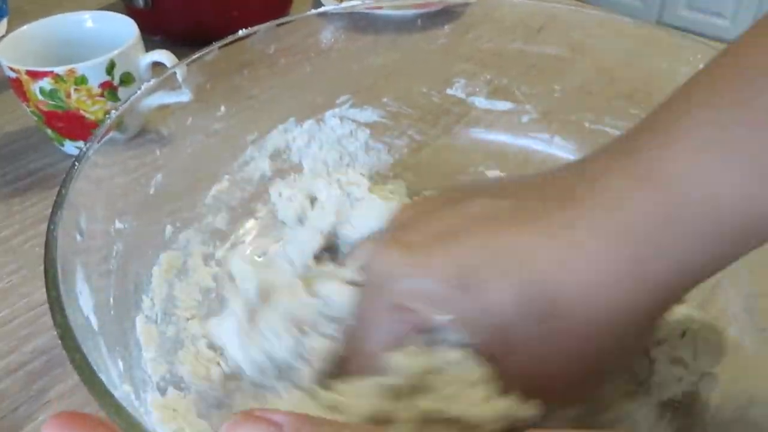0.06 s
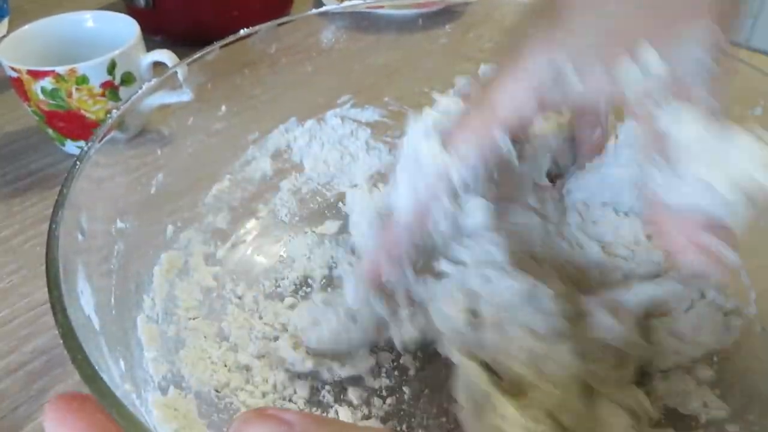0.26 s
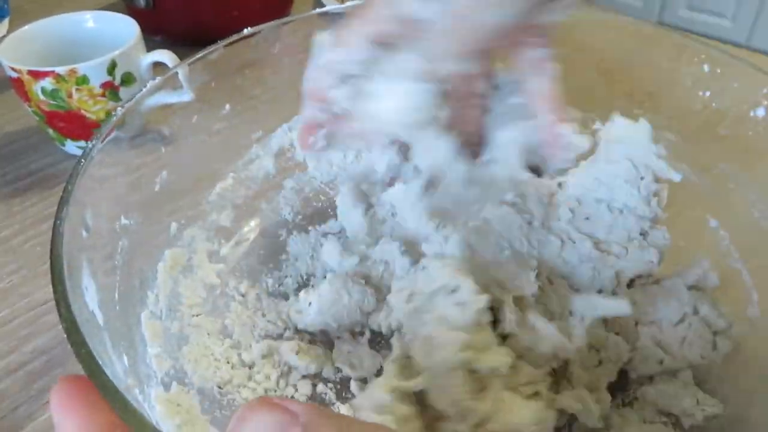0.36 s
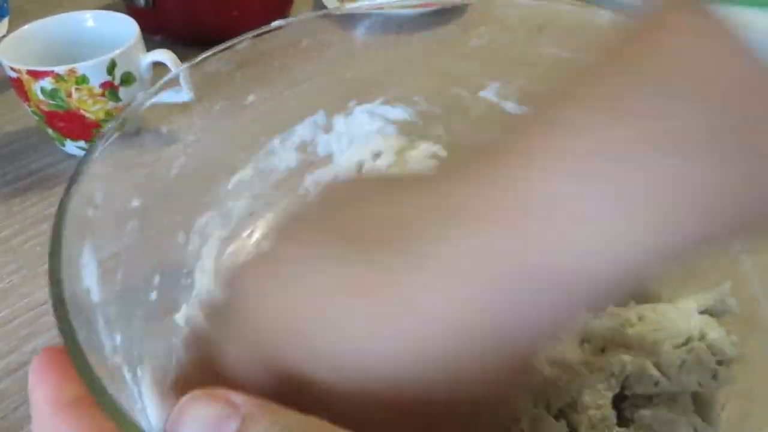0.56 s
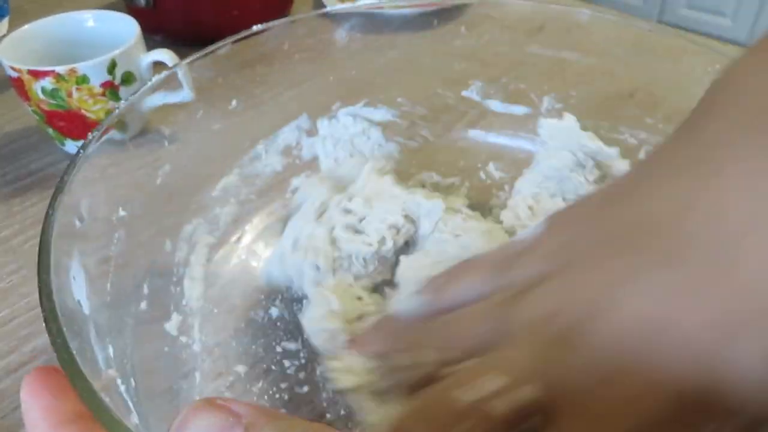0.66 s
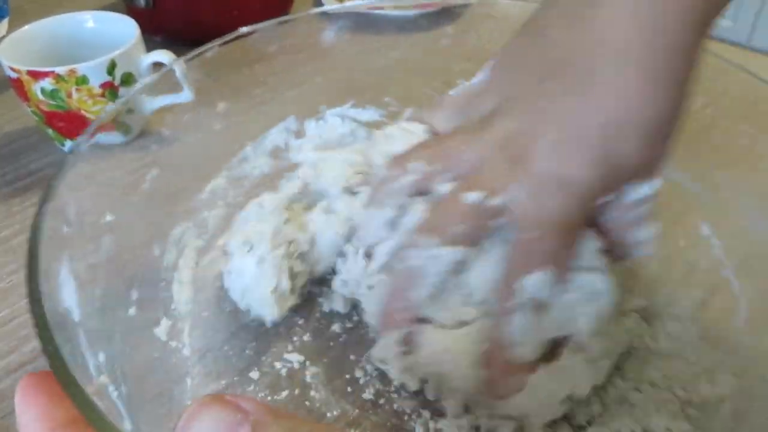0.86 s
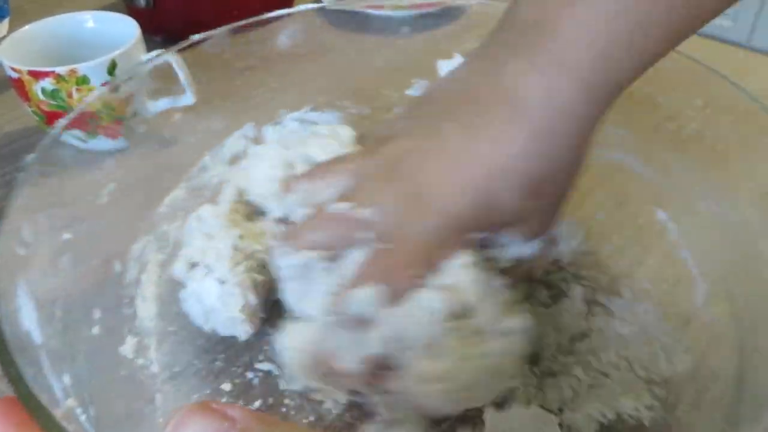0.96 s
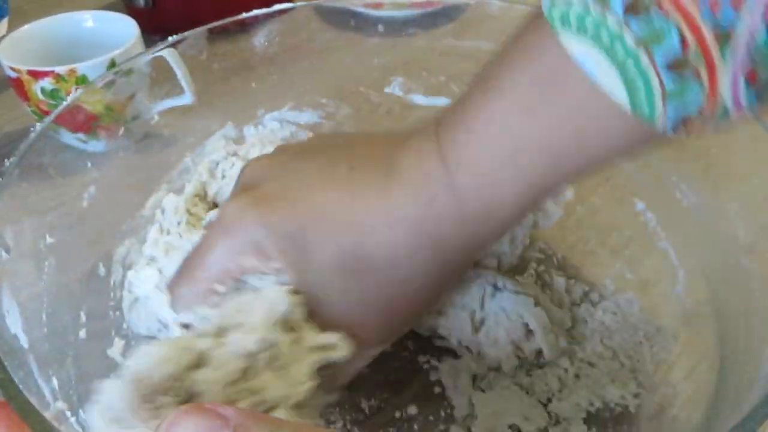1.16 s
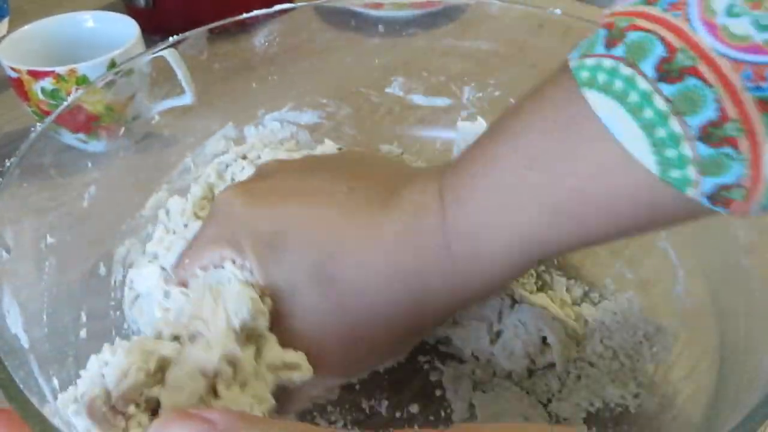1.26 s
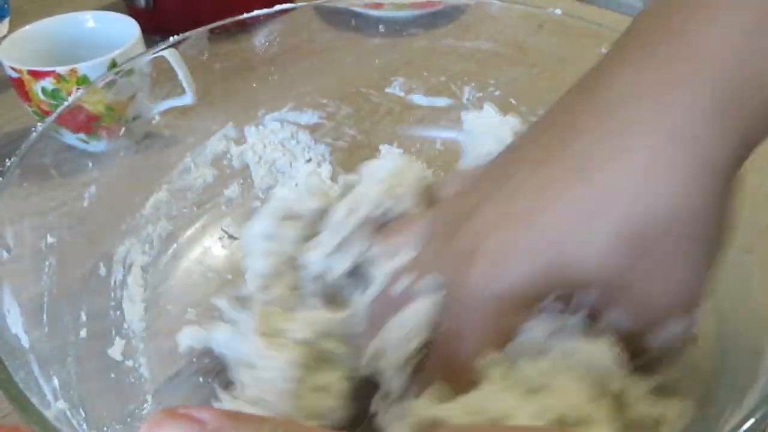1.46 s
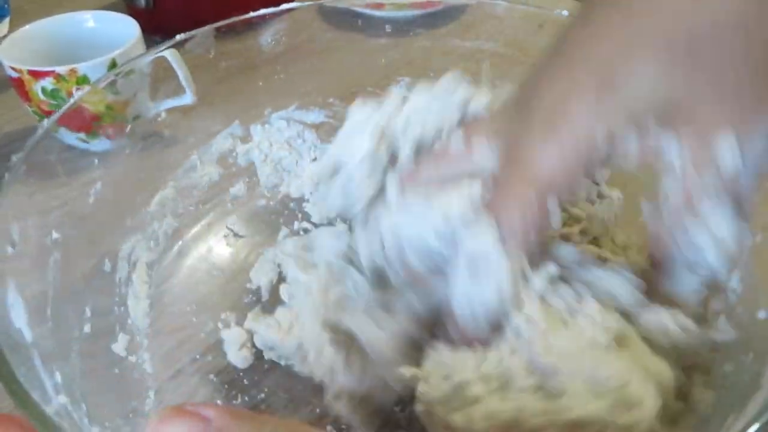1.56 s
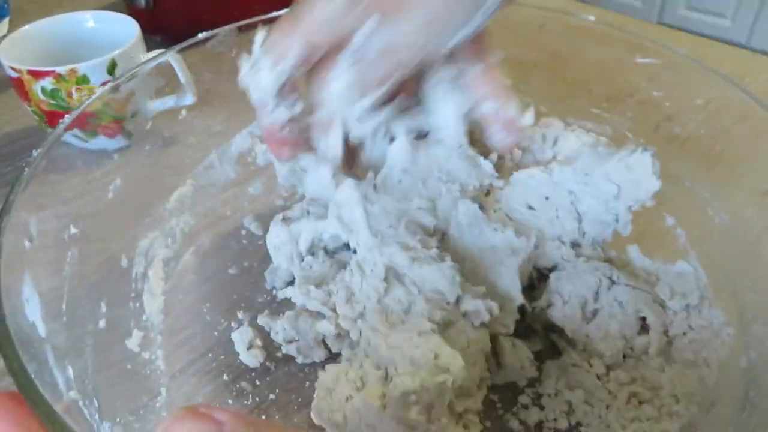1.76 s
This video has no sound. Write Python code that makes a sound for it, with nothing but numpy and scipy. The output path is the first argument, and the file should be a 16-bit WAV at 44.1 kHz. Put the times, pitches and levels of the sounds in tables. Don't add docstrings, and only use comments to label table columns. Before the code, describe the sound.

Dough being kneaded in a glass bowl, heard close through the tabletop in a quiet, faintly humming room: muffled rubbing and crumb hiss, an early woody knock with small bounces, more rocking, and late sharp sticky snaps.

```python
import sys
import numpy as np
from scipy import signal
from scipy.fft import rfft, irfft
from scipy.io import wavfile
from scipy.ndimage import uniform_filter1d

SR = 44100
rng = np.random.default_rng(int(sys.argv[2]) if len(sys.argv) > 2 else 0)


def bounce(signal):
    frames = np.transpose(np.atleast_2d(signal))
    limited = np.clip(frames, -1, 1)
    pcm = np.round(limited * 32767).astype(np.int16)
    wavfile.write(sys.argv[1], SR, pcm)


def invert_db(x):
    u = np.asarray(x, float) / 20
    return 10 ** u


N = 79380

# pitch_hz, level_db (per Hz)
CRUMB_COLOUR = [(470, -8.5), (800, -0.5), (895, 3.5), (1330, -8), (2640, -9), (2870, -9), (7480, -21),
                (15600, -27.5)]


def evened(x):
    return x / np.sqrt(np.mean(x ** 2) + 1e-20)


def colour(x, points, tilt_db=0.):
    hz = np.fft.rfftfreq(len(x), 1 / SR) + 1
    point_hz, point_db = np.transpose(points)
    level_db = np.interp(np.log(hz), np.log(point_hz), point_db)
    level_db = level_db + tilt_db * np.log2(np.clip(hz, 300, SR) / 3000)
    return irfft(rfft(x) * invert_db(level_db), len(x))


def add(mix, start_s, sound):
    part = mix[round(start_s * SR):][:len(sound)]
    part += sound[:len(part)]


def grains(per_s, spread_db):
    draw = rng.random((N, 3))
    happens = draw[:, 0] < per_s / SR
    direction = np.sign(draw[:, 1] - .5)
    return happens * direction * invert_db(-spread_db * np.log(draw[:, 2] + 0.0023))


def body(x, modes):
    hz = np.fft.rfftfreq(len(x), 1 / SR)
    shape = 0
    for k, (mode_hz, width_hz, db) in enumerate(modes):
        loss = 1j * hz * width_hz
        shape = shape + (-1) ** k * invert_db(db) * loss / (mode_hz ** 2 - hz ** 2 + loss)
    return evened(irfft(rfft(x) * shape, len(x)))


def effort(curve, column, flutter_db, smooth_s):
    flutter = evened(uniform_filter1d(rng.standard_normal(N), round(smooth_s * SR)))
    rows = np.transpose(curve)
    level_db = np.interp(np.arange(N) / SR, rows[0], rows[column])
    return invert_db(level_db + flutter_db * flutter)


def room_air():
    # pitch_hz, level_db (per Hz)
    room_points = [(15, -39), (25, -46), (96, 6), (227, 11), (389, 3.5), (445, -14.5), (553, -2.5),
                   (7520, -32), (15600, -70)]
    return invert_db(-36.5) * evened(colour(rng.standard_normal(N), room_points))


def side_air():
    # pitch_hz, level_db (per Hz)
    side_points = [(35, -38), (60, -22), (285, -1.5), (443, -0.5), (870, -8), (1790, -9), (8900, -21),
                   (13200, -22.5), (15600, -21)]
    return invert_db(-51) * evened(colour(rng.standard_normal(N), side_points))


def sway(crest_s, db, sign, hz, swell_s):
    t = np.arange(-.08, .12, 1 / SR)
    shape = np.exp(-(t / np.where(t < 0, swell_s, 1.4 * swell_s)) ** 2)
    return crest_s - .08, sign * invert_db(db) * shape * np.cos(2 * np.pi * hz * t)


def table_sways():
    # crest_s, level_db, direction, pitch_hz, swell_s
    pushes = [(.146, -32, 0.75, 219, 0.011), (.49, -16, 1, 110, 0.0045), (.507, -22, 0.84, 72, 0.009),
              (0.5631, -19.5, -1.1, 240, 0.0033), (0.5744, -26.5, 0.82, 228, 0.013),
              (0.5879, -26, 0.82, 240, 0.013), (0.662, -31.5, 0.9, 171, 0.019), (.77, -29, 0.8, 282, 0.024),
              (.82, -29.5, 0.94, 120, 0.02), (0.9703, -27.5, -1, 102, 0.0081),
              (.976, -25.5, 0.88, 258, 0.018), (1.005, -23, -1.1, 126, 0.006),
              (1.008, -30, 0.95, 282, 0.0074), (1.0216, -24.5, 0.9, 258, 0.0038),
              (1.0218, -17, 0.81, 132, 0.015), (1.044, -26, 1, 238, 0.0075),
              (1.075, -25.5, 0.83, 138, 0.0096), (1.0858, -27, -0.88, 240, 0.007),
              (1.105, -23.5, 0.66, 159, 0.011), (1.131, -36, -0.65, 195, 0.0053),
              (1.354, -28.5, 0.67, 215, .015), (1.446, -26, 0.88, 230.3, 0.027),
              (1.595, -33, 0.66, 228, 0.0054)]
    mix = np.zeros(N)
    for push in pushes:
        add(mix, *sway(*push))
    return mix


def knock(peak_s, db, sign, pitch_share, blow_s, modes):
    damp_s, tail_share = .015, .25
    t = np.arange(-.02, .25, 1 / SR)
    after = np.maximum(t, 0)
    swell = np.exp(-(np.minimum(t, 0) / blow_s) ** 2)
    fade = tail_share + (1 - tail_share) * np.exp(-(after / damp_s) ** 2)
    ring = 0
    for hz, mode_db, t60 in modes:
        ring = ring + invert_db(mode_db - 60 * after / t60) * np.cos(2 * np.pi * hz * pitch_share * t)
    return peak_s - .02, sign * invert_db(db) * swell * fade * ring


def bowl_knocks():
    # pitch_hz, level_db, t60_s (time to fall 60 dB)
    thud_modes = [(70, -3.5, 0.15), (120, 2, 0.36), (238, 1.5, 0.099), (264, -19, 0.27)]
    # peak_s, level_db, direction, pitch_share (times the mode pitch), blow_s
    landings = [
        (0.4407, -19.5, -0.31, 1.7, 0.0018),
        (0.4475, -8.5, 0.79, 1.02, 0.0041),
        (0.4715, -20.5, -0.77, 1.56, 0.0025),
        (0.486, -27.5, -0.97, 0.77, 0.0033),
        (0.5635, -22.5, -0.79, 2.02, 0.0016),
        (0.598, -29, 0.85, 0.635, 0.02),
        (1.0553, -28, -0.44, 1.9, 0.0023),
    ]
    mix = np.zeros(N)
    for landing in landings:
        add(mix, *knock(*landing, thud_modes))
    return mix


def tap(start_s, db, hz, spread, contact_s, modes):
    t = np.arange(0, .1, 1 / SR)
    ring = 0
    for (mode_hz, mode_db, t60), turn in zip(modes, rng.random(len(modes))):
        off_pitch_db = 10.2 * (np.log2(mode_hz / hz) / spread) ** 2
        level = invert_db(mode_db - off_pitch_db - 60 * t / t60)
        ring = ring + level * np.sin(2 * np.pi * (mode_hz * t + turn))
    return start_s, invert_db(db) * 2 * ring * (1 - np.exp(-(t / contact_s) ** 2))


def glass_taps():
    # pitch_hz, level_db, t60_s
    glass_modes = [(500, 1, .06), (700, -4, .035), (1030, -2, .045), (1351, -8, .03), (1620, -7, .04),
                   (1770, -7, .03), (2330, -9, .04), (3050, -12, .02), (3714, -14, .025), (4960, -14, .035),
                   (6060, -12, .035), (7337, -15, .025)]
    # start_s, level_db, centre_hz, spread_octaves, contact_s
    touches = [(.1675, -36, 1800, .3, .001), (.312, -38, 1750, .3, .001), (.4375, -24, 693, .42, .0013),
               (.441, -32, 1350, .3, .0015), (.446, -30, 600, 1.2, .003), (.555, -32, 1600, .5, .001),
               (.5595, -24, 1900, 2.2, .003), (.577, -30, 1650, .3, .0015), (.643, -31, 1400, .6, .002),
               (.651, -28, 3300, .5, .0015), (.652, -26, 1720, .35, .0018), (.689, -32, 2270, .45, .003),
               (1.0326, -34, 1400, .4, .001), (1.395, -32, 750, .7, .001), (1.418, -36, 1030, .3, .0015)]
    mix = np.zeros(N)
    for touch in touches:
        add(mix, *tap(*touch, glass_modes))
    return mix


def dough_tears():
    # pitch_hz, level_db, t60_s
    pocket_modes = [(700, -9, .02), (1000, -7, .022), (1700, -5, .006), (2100, -10, .005), (2600, -6, .006),
                    (3200, -6, .006), (4200, -6, .004), (5300, -3, .004), (7500, 1, .004), (9000, -2, .003),
                    (11600, -6, .003), (14000, -11, .003)]
    # start_s, level_db, centre_hz, spread_octaves, contact_s
    snaps = [
        (1.5288, -28, 2600, .6, .0005),
        (1.5331, -19, 6000, 4., .0004),
        (1.5359, -22, 3100, .4, .0004),
        (1.543, -29, 2600, .4, .0005),
        (.205, -29, 2900, .7, .0005),
        (.2125, -36, 6000, 2., .0004),
        (.2155, -30, 2900, .5, .0005),
        (.2315, -32, 1700, .4, .0005),
        (.2375, -32, 2000, .5, .0005),
        (1.064, -30, 2600, .8, .0005),
    ]
    mix = np.zeros(N)
    for snap in snaps:
        add(mix, *tap(*snap, pocket_modes))
    return mix


def scuff(middle_s, length_s, db, bright_db):
    t = np.arange(-.05, .05, 1 / SR)
    puff = evened(colour(rng.standard_normal(len(t)), CRUMB_COLOUR, bright_db))
    side_s = np.where(t < 0, .6 * length_s, 1.4 * length_s)
    return middle_s - .05, invert_db(db) * puff * np.exp(-(2 * t / side_s) ** 2)


def crumb_scuffs():
    # middle_s, length_s, level_db, brightness_db (per octave)
    puffs = [(.565, .04, -46, 1), (1.272, .01, -52, 3), (.207, .02, -40, 1.5), (1.5295, .005, -43, 7),
             (1.536, .016, -41, 1), (.444, .022, -33, -6), (.563, .016, -35, -1), (.653, .014, -39, 0),
             (.9, .05, -46, 0), (1.04, .02, -42, -1), (1.058, .025, -40, -1)]
    mix = np.zeros(N)
    for puff in puffs:
        add(mix, *scuff(*puff))
    return mix


def stroke(start_s, length_s, hz, width_hz, db):
    size = round(length_s * SR)
    slips = grains(1300, 3.3)[:SR // 2]
    song = body(slips, [(hz, width_hz, 0)])[:size]
    return start_s, invert_db(db) * signal.windows.tukey(size, .5) * song


def palm_strokes():
    # start_s, length_s, pitch_hz, width_hz
    sweeps = [(0, .44, 1880, 130), (.2, .12, 1350, 80), (.28, .13, 1650, 120), (.64, .13, 1630, 110),
              (.64, .13, 1790, 110), (1.36, .1, 1630, 50), (1.56, .22, 1750, 100), (1.62, .14, 1950, 120),
              (1.55, .25, 3700, 300), (.75, .04, 7350, 100), (.84, .1, 7600, 900), (.05, .31, 690, 70),
              (1.62, .18, 710, 60), (.7, .16, 560, 50), (1.03, .06, 3000, 1800), (.26, .08, 285, 25),
              (1.69, .1, 115, 40)]
    sweep_db = [-50.5, -57, -61, -52, -49, -50.5, -52.5, -53, -60, -60.5, -56, -45, -57, -47.5, -66, -38.5,
                -41]
    mix = np.zeros(N)
    for sweep, db in zip(sweeps, sweep_db):
        add(mix, *stroke(*sweep, db))
    return mix


def kneading():
    # time_s, table_shake_db, palm_rub_db
    hand_curve = [(0.0, -40, -42), (0.11, -32, -41), (0.36, -38, -40), (0.586, -29, -44), (.75, -38.5, -42),
                  (0.93, -33.5, -48.5), (1.076, -31.5, -42), (1.208, -38, -55.5), (1.402, -37, -44.5),
                  (1.634, -36.5, -42.5), (1.8, -38, -41)]
    # pitch_hz, width_hz, level_db
    table_modes = [(37, 28, -5.5), (71, 10.8, -1), (118.2, 19.5, 1), (168, 27, -7), (232, 14.6, 4),
                   (295.4, 44, -10.5), (441, 40, -6.5)]
    # pitch_hz, width_hz, level_db
    bowl_modes = [(499, 69, 7.5), (578, 15.5, 11.5), (669, 72, 8), (835, 54, 5.5), (1124, 104, -4.5),
                  (1810, 520, -6), (2770, 2900, -22)]
    # time_s, level_db
    crumb_curve = [(0, -56.5), (.18, -54), (.29, -52), (.43, -59.5), (.56, -51), (.66, -52.5), (.78, -53),
                   (.83, -51), (.89, -48), (.95, -53), (1.0, -56), (1.12, -53.5), (1.3, -57.5),
                   (1.38, -60.5), (1.5, -50.5), (1.62, -52), (1.72, -59), (1.8, -58.5)]

    legs = body(grains(1200, 4.5), table_modes[:2])
    top = body(grains(1200, 4.5), table_modes[2:])
    pressed_top = effort(hand_curve, 1, 2.0, 0.071) * top
    shake = signal.lfilter(*signal.butter(2, 600, fs=SR), pressed_top) + invert_db(-44) * legs

    rub = effort(hand_curve, 2, 1.0, 0.012) * body(grains(1900, 1.5), bowl_modes)

    flow = effort(crumb_curve, 1, 1.1, .015)
    hiss = flow * evened(colour(grains(6000, 0.5), CRUMB_COLOUR, 1.67))
    return invert_db(-1.0) * shake + invert_db(-0.5) * rub + invert_db(5.5) * hiss


def scene():
    mid = room_air() + table_sways() + bowl_knocks() + glass_taps() + dough_tears()
    mid = mid + crumb_scuffs() + palm_strokes() + kneading()
    late = np.roll(mid, 90)
    echo = signal.lfilter(*signal.butter(2, 350, "high", fs=SR), late)
    side = side_air() + invert_db(-33) * echo
    return np.array([mid + side, mid - side])


def band_limit(x):
    return signal.sosfilt(signal.butter(12, 15710, fs=SR, output="sos"), x)


def record(dry):
    low_pass = signal.firwin(401, 15400, fs=SR)
    mix = signal.oaconvolve(dry, low_pass[None], "same")
    return band_limit(mix)


dry = scene()
out = record(dry)
bounce(out)
```